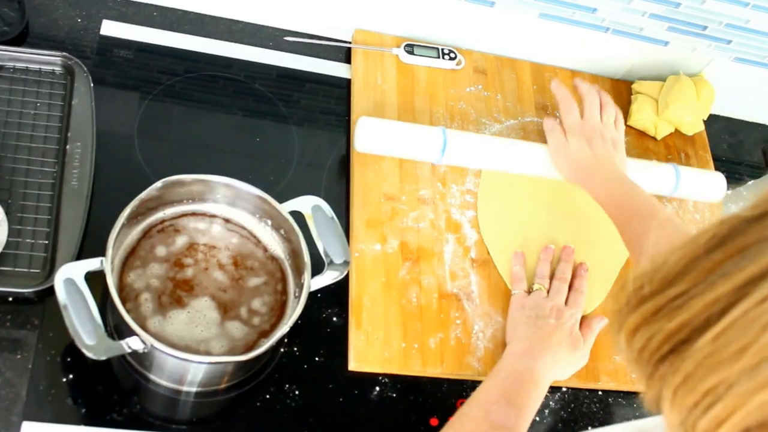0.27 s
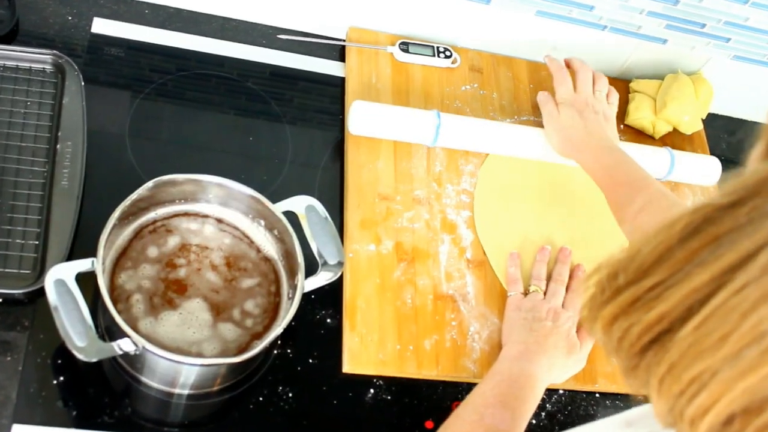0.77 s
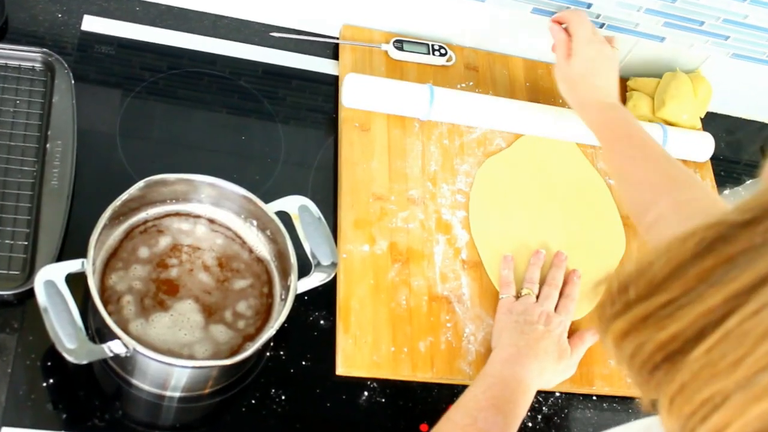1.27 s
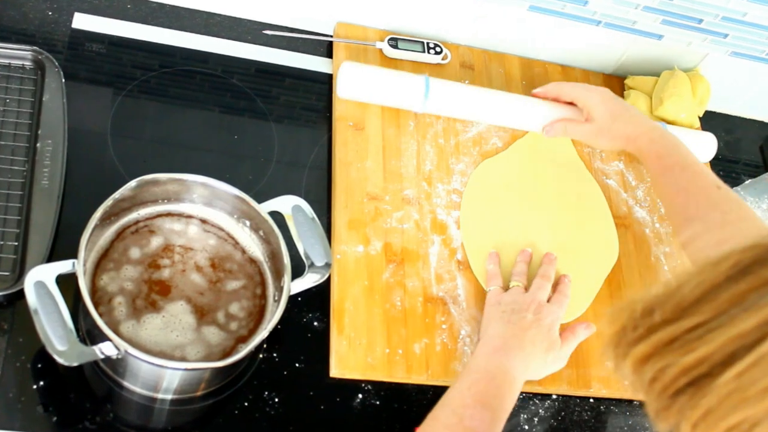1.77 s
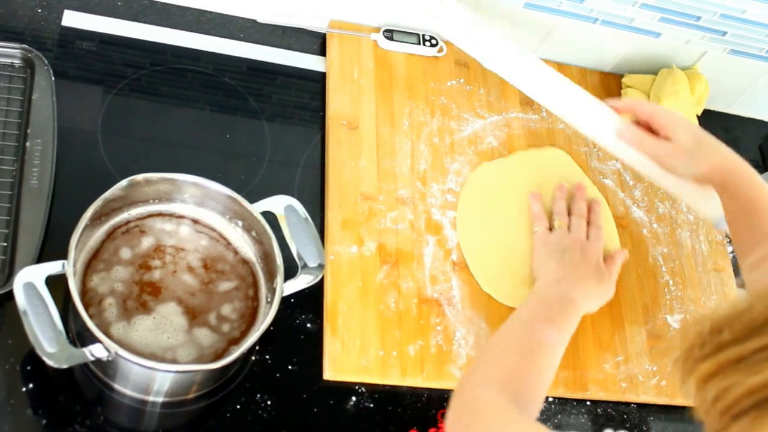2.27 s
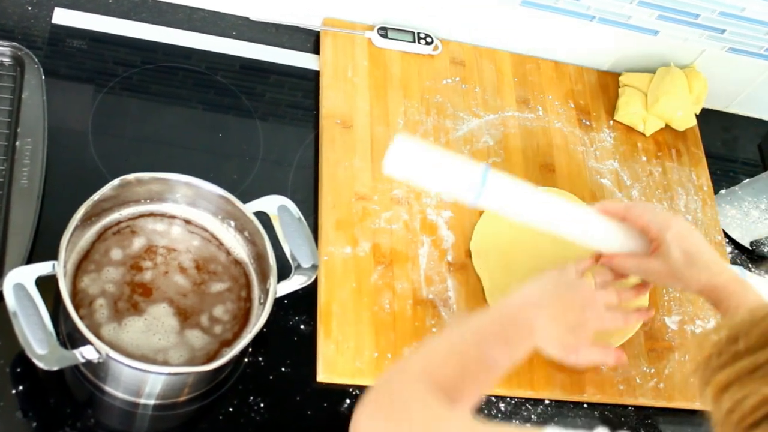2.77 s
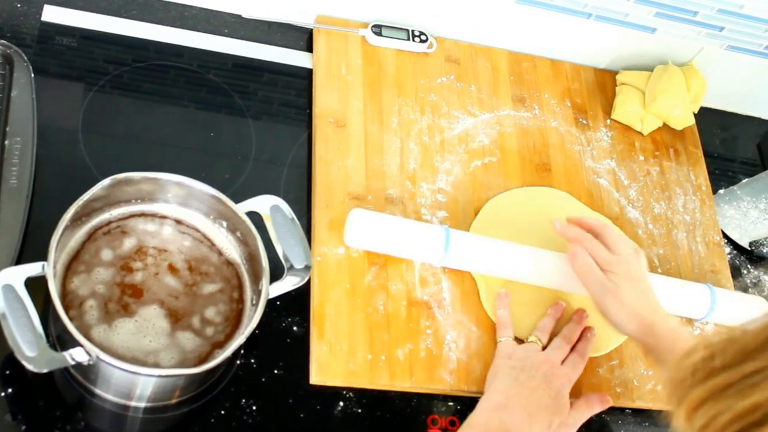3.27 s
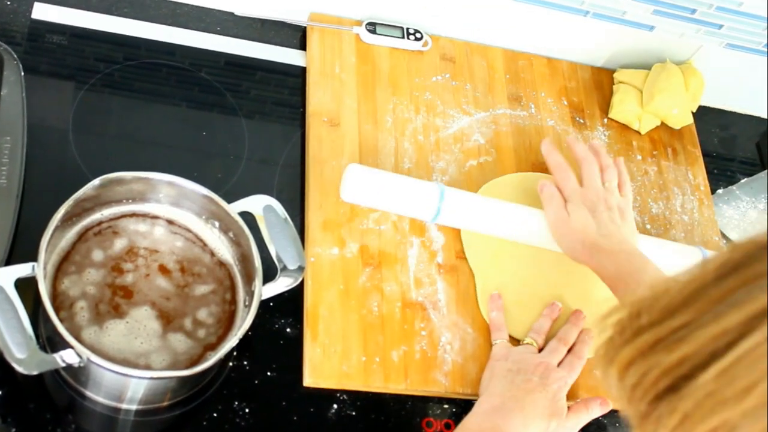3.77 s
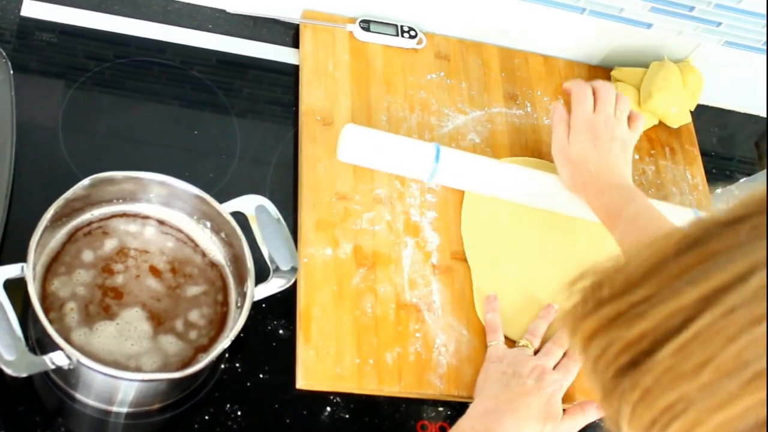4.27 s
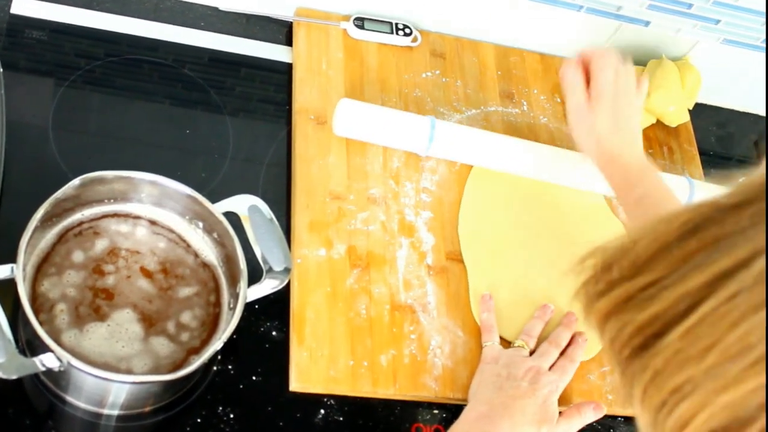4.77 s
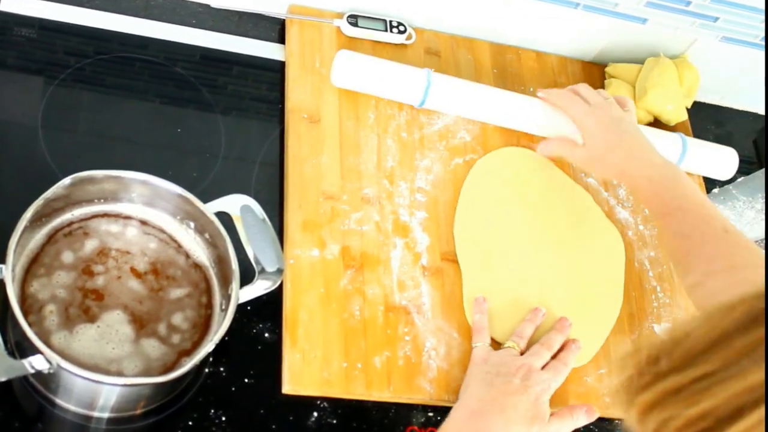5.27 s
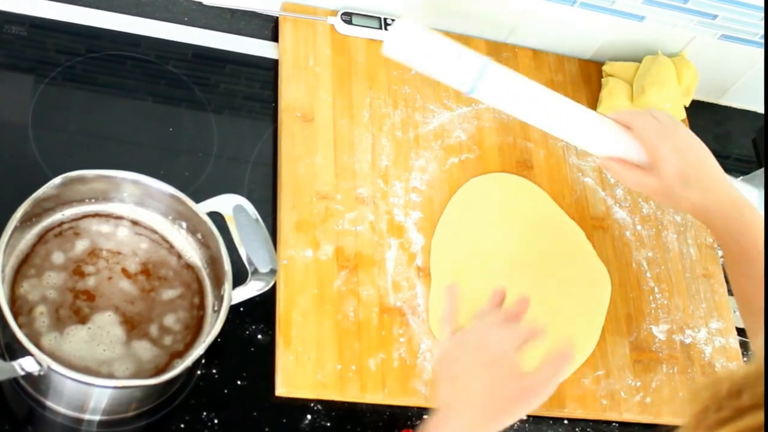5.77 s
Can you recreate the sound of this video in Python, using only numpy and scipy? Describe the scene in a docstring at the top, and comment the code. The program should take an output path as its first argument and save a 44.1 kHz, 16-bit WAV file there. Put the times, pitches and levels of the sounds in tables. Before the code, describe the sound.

A hollow plastic rolling pin brushes under a palm over floury dough, then clatters and knocks sharply on a wooden board above a quiet stove hum.

```python
"""A hollow plastic rolling pin works dough on a wooden board in a small kitchen, two microphones close above.
The pin is lifted, clatters against the board and is set down again: struck modes, dense cracks, tube rings and
low worktop thuds. A palm brushes along it and dough slides on the flour, both as shaped friction noise.
Underneath lie the steady hum and hiss of the stove, from wavering sines and coloured noise."""
import sys
import numpy as np
from scipy import signal
from scipy.fft import rfft, irfft
from scipy.io import wavfile

SR = 44100
rng = np.random.default_rng(int(sys.argv[2]) if len(sys.argv) > 2 else 0)


def output_pcm(signal):
    """Save a mono or channel-first signal as 16-bit PCM at the path in sys.argv[1].

    Samples are clipped to [-1, 1] before scaling.
    """
    pcm = np.clip(np.atleast_2d(signal).T, -1, 1) * 32767
    wavfile.write(sys.argv[1], SR, np.round(pcm).astype(np.int16))


N = 265482
TIME = np.arange(N) / SR


def from_db(db):
    """Decibels to gain."""
    return 10 ** (np.asarray(db) / 20)


def rms_one(x):
    """Scale to unit rms."""
    return x / np.sqrt(np.mean(x ** 2) + 1e-20)


def at_hz(points, hz, axis=1):
    """Read one column of a table on a log-frequency axis."""
    points = np.array(points)
    return np.interp(np.log(np.maximum(hz, 1)), np.log(points[:, 0]), points[:, axis])


def shape_spectrum(spectrum, size):
    """Gain at each bin of a real Fourier transform, from rows of (Hz, dB)."""
    return from_db(at_hz(spectrum, np.fft.rfftfreq(size, 1 / SR)))


def noise(spectrum, size=N):
    """White noise coloured by rows of (Hz, dB)."""
    white = rng.standard_normal(size)
    return irfft(rfft(white) * shape_spectrum(spectrum, size), size)


def drift(rate):
    """Random wander of unit rms: straight lines between chance values, rate of them a second."""
    return rms_one(np.interp(TIME * rate, np.arange(8192), rng.standard_normal(8192)))


def low_pass(x, hz, order=2):
    """Causal low-pass."""
    return signal.sosfilt(signal.butter(order, hz, fs=SR, output="sos"), x)


def high_pass(x, hz, order=2):
    """Causal high-pass."""
    return signal.sosfilt(signal.butter(order, hz, "high", fs=SR, output="sos"), x)


def resonance(x, hz, width):
    """Two-pole resonance with gain 1 on top, width in Hz."""
    radius = np.exp(-np.pi * width / SR)
    zeros = np.array([1, 0, -1]) * (1 - radius * radius) / 2
    poles = [1, -2 * radius * np.cos(2 * np.pi * hz / SR), radius * radius]
    return signal.lfilter(zeros, poles, x)


def fade(t, t60):
    """Exponential decay, 60 dB down after t60 seconds."""
    return np.exp(-np.log(1000) * t / t60)


def ring(modes, t, spread_db=0, travel_s=0):
    """Struck modes; bending waves are slower at low pitch, so the bass arrives last (travel time given at 1 kHz)."""
    out = 0
    for hz, db, t60 in modes:
        age = np.maximum(t - travel_s * np.sqrt(1000 / hz), 0)
        gain = from_db(db + spread_db * rng.normal())
        out = out + gain * np.sin(2 * np.pi * hz * age) * fade(age, t60)
    return out


def add(out, s, sound):
    """Mix a sound in at time s."""
    start = int(s * SR)
    out[start:start + len(sound)] += sound[:N - start]


def push(start, length, peak_share, roundness):
    """One hand movement: pressure builds to its peak, then lets go more quickly."""
    # peak_share: how far into the movement the peak lies; roundness: small = flat-topped, large = pointed
    phase = np.interp(TIME, start + length * np.array([0, peak_share, 1]), [0, .5, 1])
    return (4 * phase * (1 - phase)) ** roundness


# Colour of the stove's fan noise as heard at the board. Each row: frequency in Hz, relative level in dB.
STOVE_COLOUR = [(15, -61), (25, -52), (48, -10.5), (152, -7), (188, 0), (322, -7.5), (368, 2.5), (445, -8),
                (552, -6.5), (762, -12.5), (997, -12), (2060, -17.5), (2300, -15), (3530, -17.5),
                (15500, -30.5)]
# Hum lines of the stove. Each row: frequency in Hz, level in dB rms about which it wavers.
STOVE_HUM = [(59.2, -75.5), (178, -67.5), (270, -73), (301, -65.5), (361, -73), (539, -63)]
FAN_DB = -51.88   # rms


def stove():
    """Even fan noise with a few hum lines that waver in phase and level."""
    hum = 0
    for hz, db in STOVE_HUM:
        wander = 0.97 * drift(9.8)   # radians
        line = np.sqrt(2) * np.sin(2 * np.pi * hz * TIME + wander)
        hum = hum + from_db(db) * line * from_db(2.6 * drift(7.1))
    return from_db(FAN_DB) * rms_one(noise(STOVE_COLOUR)) + hum


# The small kitchen's diffuse tail. Each row: frequency in Hz, level in dB, decay t60 in seconds.
ROOM_TAIL = [(60, -1, 0.95), (169, -15.5, 0.59), (380, 1, 0.33), (560, -13.5, 0.51), (850, -11, 0.65),
             (1600, -10, 0.42), (3340, -13.5, 0.67), (7100, -6, 0.21), (15000, -13, 0.096)]
# Near reflections off worktop, wall and cupboards. Each row: delay in seconds, level in dB.
NEAR_ECHOES = [(.0028, -20), (.0078, -20.5), (0.0136, -15), (.0350, -19.5)]


def kitchen(x):
    """A few near reflections, then a diffuse tail that dies band by band."""
    t, edges = TIME[:SR], np.geomspace(45, 16000, 13)
    response = np.zeros(len(t))
    build_up = 1 - np.exp(-(t / 0.015) ** 2)
    for low, high in zip(edges, edges[1:]):
        hz = np.sqrt(low * high)
        band_filter = signal.butter(2, [low, high], "band", fs=SR, output="sos")
        band = signal.sosfilt(band_filter, rng.standard_normal(len(t)))
        tail = band * fade(t, at_hz(ROOM_TAIL, hz, axis=2)) * build_up
        band_share = np.sqrt(2 * (high - low) / SR / len(t))
        response += from_db(at_hz(ROOM_TAIL, hz)) * rms_one(tail) * band_share
    for delay, db in NEAR_ECHOES:
        response[int(delay * SR)] += from_db(db)
    return signal.fftconvolve(x, low_pass(response, 11670))[:N]


# Weight coming on or off the board rocks the worktop. Each row: time in seconds, level in dB.
WEIGHT_SHIFTS = [(0.26, -29), (2.565, -24), (3.414, -27), (3.48, -28), (5.262, -23.5), (5.805, -37)]
# Modes of the worktop under the board. Each row: frequency in Hz, level in dB, decay t60 in seconds.
WORKTOP_MODES = [(53.3, -1.5, 0.19), (66.4, 0, 0.12), (112.5, 9, 0.083)]


def thuds():
    """The heavy worktop takes a few cycles to swing up."""
    out, t = np.zeros(N), TIME[:SR // 2]
    swing_up = (1 - np.exp(-t / 0.034)) ** 2
    for s, db in WEIGHT_SHIFTS:
        add(out, s, from_db(db) * ring(WORKTOP_MODES, t) * swing_up)
    return high_pass(out, 35)


# Colour of floury dough on the board. Each row: frequency in Hz, relative level in dB.
FLOUR_COLOUR = [(350, -49), (600, -29), (726, -18), (927, -10), (1140, -18), (1530, -6), (1990, -9.5),
                (3330, -3), (4030, -12.5), (11600, -29), (15500, -37)]
# Dough slides on the flour. Each row: start in seconds, length in seconds, level in dB.
DOUGH_SLIDES = [(0.07, 0.33, -58), (0.504, 0.13, -59), (1.433, .22, -55), (1.724, .18, -55.5),
                (2.556, 0.42, -41), (5.06, 0.18, -57), (5.5, 0.35, -52.5), (5.863, 0.21, -53)]


def dough():
    """Dough slid on flour gives a fine, bright hiss that swells with each slide and flickers."""
    sliding = sum(from_db(db) * push(start, length, peak_share=0.67, roundness=0.73)
                  for start, length, db in DOUGH_SLIDES)
    return rms_one(noise(FLOUR_COLOUR)) * from_db(0.61 * drift(240)) * sliding


# Colour of skin on plastic. Each row: frequency in Hz, relative level in dB.
SKIN_COLOUR = [(150, -6.5), (400, -3), (1000, 0.5), (1700, -3.5), (3600, -6), (5000, -19.5), (9000, -22.5),
               (16000, -52)]
# Air column inside the tube. Each row: frequency in Hz, width in Hz, relative level in dB.
TUBE_AIR = [(843, 96, -6), (1608, 56, 4.5), (2310, 52, -1)]
# The palm pushes the pin along in short strokes.
# Each row: start in seconds, length in seconds, level in dB, hollow of the tube in dB above that level.
PALM_STROKES = [(-0.05, 0.068, -44, -6), (0.125, .16, -51.5, -13), (0.388, 0.1, -52.5, -8),
                (0.604, .08, -55, -20), (0.738, 0.15, -52.5, -22), (0.922, 0.1, -56.5, -20),
                (1.72, 0.2, -56.5, -14), (2.03, 0.23, -45.5, -25), (3.725, 0.23, -49, -17),
                (3.964, 0.15, -46.5, -10), (4.166, .11, -47, -7), (4.321, 0.17, -51, -16),
                (4.567, 0.31, -53, -20), (4.753, .18, -53, 2), (5.262, 0.13, -51.5, -22)]
# The pin rolls on under the hand. Each row: start in seconds, end in seconds.
ROLLING_SPANS = [(0, 2.5), (3.68, 5.45)]
ROLLING_DB, ROLLING_EDGE_S = -63, 0.029


def palm():
    """Skin friction follows the hand's pressure and colours itself in the tube's air column."""
    rolling = 0
    for start, end in ROLLING_SPANS:
        rolling = rolling + np.clip(np.minimum(TIME - start, end - TIME) / ROLLING_EDGE_S, 0, 1)
    pressure, hollow = from_db(ROLLING_DB) * rolling, 0
    for start, length, db, hollow_db in PALM_STROKES:
        stroke = from_db(db) * push(start, length, peak_share=0.67, roundness=1)
        pressure = np.hypot(pressure, stroke)
        hollow = hollow + from_db(hollow_db) * stroke
    skin = rms_one(noise(SKIN_COLOUR))
    brushing = skin * from_db(2.2 * drift(150)) * pressure
    column = sum(from_db(db) * resonance(skin, hz, width) for hz, width, db in TUBE_AIR)
    return brushing + rms_one(column) * hollow


# The many small modes that blur into a crack. Each row: frequency in Hz, relative level in dB.
CRACK_COLOUR = [(100, -3), (400, 4.5), (570, -13), (1100, 4), (2000, 2.5), (3700, 4), (5000, -2.5),
                (8000, -6.5), (13000, -8.5), (16000, -10)]


def crack(t, t60):
    """The dense, quickly dying modes of a contact."""
    return noise(CRACK_COLOUR, size=len(t)) * fade(t, t60)


# Soft pats of hand and dough. Each row: time in seconds, level in dB, cut-off in Hz.
SOFT_PATS = [(0.256, -24, 370), (0.433, -31, 895), (0.636, -34.5, 1080), (1.030, -32, 885),
             (3.855, -34, 305), (4.665, -22, 480), (4.689, -24.5, 480), (5.568, -27.5, 456)]


def pats():
    """Flesh on dough gives a blurred bump with no ring."""
    out, t = np.zeros(N), TIME[:SR // 4]
    onset = 1 - np.exp(-t / 0.00083)
    for s, db, cut_hz in SOFT_PATS:
        bump = crack(t, t60=0.12) * onset
        add(out, s, from_db(db) * low_pass(bump, cut_hz, order=3))
    return out


# Light hard ticks of the pin's rim.
# Each row: time in seconds, level in dB, contact cut-off in Hz, ringing of the tube in dB.
RIM_TICKS = [(0.249, -34, 3460, -50), (0.3857, -38.5, 2800, -60), (0.4234, -47, 6000, -58),
             (2.1476, -16, 3430, -36), (2.1776, -28, 4300, -40), (2.267, -17.5, 13100, -42),
             (2.5559, -28.5, 4160, -42), (3.084, -43, 5000, -53), (3.4052, -23.5, 3360, -38),
             (3.7000, -39, 2460, -58), (5.098, -41, 7000, -55), (5.2470, -40.5, 6070, -58),
             (5.7965, -27.5, 3000, -52), (5.8419, -25.5, 3860, -0.5), (5.8440, -32.5, 9000, -30),
             (5.867, -31, 3950, -26), (5.8840, -27, 3180, -31)]
# The plastic tube's own ring. Each row: frequency in Hz, level in dB, decay t60 in seconds.
TUBE_MODES = [(1505, -33.5, 0.1), (2300, -18.5, 0.061), (2460, -40, .03), (2690, -35, 0.067),
              (3120, -29.5, 0.057), (2900, -29, 0.056), (3830, -26, 0.03), (3900, -35, 0.026)]


def ticks():
    """The rim clicks; where the tube is free it rings on."""
    out, t = np.zeros(N), TIME[:SR // 2]
    for s, db, contact_hz, tube_db in RIM_TICKS:
        click = from_db(db) * low_pass(crack(t, t60=0.034), contact_hz, order=3)
        tube = from_db(tube_db) * ring(TUBE_MODES, t, travel_s=0.00197)
        add(out, s, click + tube)
    return out


# Board and pin ringing together. Each row: frequency in Hz, level in dB, decay t60 in seconds.
BOARD_MODES = [(109.6, -38, 0.56), (147.8, -27, 0.25), (206, -16, 0.069), (673, -29, 0.19),
               (702.7, -14, 0.095), (778, -8, 0.057), (840, -25, 0.2), (1063, -21.5, 0.049),
               (1157, -23.5, 0.045), (1330, -22, 0.053), (1505, -21.5, 0.072), (1570, -14, 0.014),
               (1870, -27.5, 0.073), (2158, -20, 0.066), (2310, -33, 0.074), (2960, -41, .04),
               (3570, -36, 0.061), (3820, -42, 0.067)]
# The board's broad low boom. Each row: frequency in Hz, level in dB, decay t60 in seconds.
BOOM_MODES = [(349.8, -18, 0.14), (386.8, -4.5, 0.046), (454.5, -12.5, 0.035), (475, -20, 0.06)]
BOOM_DELAY_S, BOOM_RISE_S = 0.0045, 0.0035   # it blooms a moment after a blow
# Pin on board. Each row: time in seconds, strength in dB, bass edge in Hz, contact cut-off in Hz,
# pitch favoured by the struck spot in Hz, its boost in dB, dense crack in dB.
PIN_KNOCKS = [(2.0440, -40.5, 200, 1500, 382, 15, 2), (2.148, -9.5, 102, 1000, 321, 13.5, 3),
              (2.1765, -28, 240, 1280, 330, 24.5, -4), (2.208, -39, 101, 1210, 210, 24, 1),
              (2.2558, -10.5, 218, 6350, 397, 6.5, 4), (2.2643, -6.5, 252, 3980, 3040, 2.5, 2),
              (2.2681, -2, 237, 2980, 1470, 9.5, -1), (2.2985, -10.5, 357, 15300, 470, 15.5, 3),
              (2.3872, -13, 180, 1320, 338, 6.5, 7), (2.396, -24, 80, 242, 109, 23, -8),
              (2.5550, -31, 90, 1290, 319, 18, -25), (3.4056, -5, 100, 1033, 854, 9.5, 7),
              (5.251, -26, 90, 547, 200, 9.5, 9.5), (5.269, -29.5, 90, 840, 220, 6.5, 2),
              (5.7966, -9, 100, 1240, 420, 5.5, 0), (5.841, -38, 130, 480, 415, 9, -9)]


def knocks():
    """A softer contact loses the treble, a blow near a support the bass; the struck spot favours some modes."""
    out, t = np.zeros(N), TIME[:SR // 2]
    late = np.maximum(t - BOOM_DELAY_S, 0)
    swell = 1 - np.exp(-late / BOOM_RISE_S)
    for s, db, bass_hz, contact_hz, spot_hz, spot_db, crack_db in PIN_KNOCKS:
        blow = ring(BOARD_MODES, t, spread_db=3.5, travel_s=0.00077)
        blow = blow + swell * ring(BOOM_MODES, late)
        blow = blow + from_db(crack_db) * crack(t, t60=0.04)
        blow = blow + (from_db(spot_db) - 1) * resonance(blow, spot_hz, 0.15 * spot_hz)
        softened = low_pass(blow, contact_hz, order=4)
        add(out, s, from_db(db) * high_pass(softened, bass_hz))
    return high_pass(out, 65)


# Colour of the stereo side. Each row: frequency in Hz, level in dB.
SIDE_COLOUR = [(60, -50), (250, -67), (500, -32), (1000, -34), (2000, -76), (4000, -25), (8000, -10),
               (15000, -9)]


def two_microphones(x):
    """Nearly mono: a faint quarter-turn side signal, strongest in the top treble."""
    # added on one side and taken away on the other
    side = irfft(1j * rfft(x) * shape_spectrum(SIDE_COLOUR, N), N)
    balance = from_db([[-.15], [.15]])
    return x * balance + side * [[1], [-1]]


def scene():
    """The work on the board in its room, the stove, and a faint hiss in each microphone."""
    blows = knocks() + ticks() + pats()
    sound = stove() + thuds() + dough() + palm() + blows + kitchen(blows)
    hiss = from_db(-66) * rng.standard_normal((2, N))
    return two_microphones(sound) + hiss


def record(dry):
    """The loudest peaks are rounded; the deepest bass and the top are cut."""
    rounded = dry / (1 + (dry / .9) ** 6) ** (1 / 6)
    top_cut = signal.ellip(10, .1, 80, 15800, fs=SR, output="sos")
    return signal.sosfilt(top_cut, high_pass(rounded, 32))


dry = scene()
out = record(dry)
output_pcm(out)
```